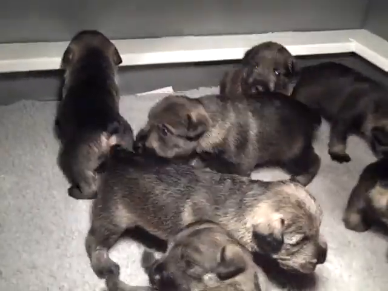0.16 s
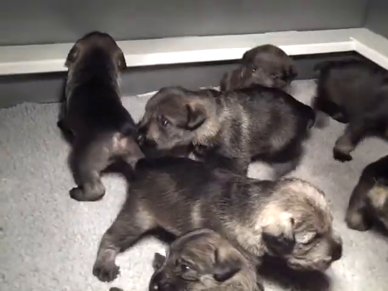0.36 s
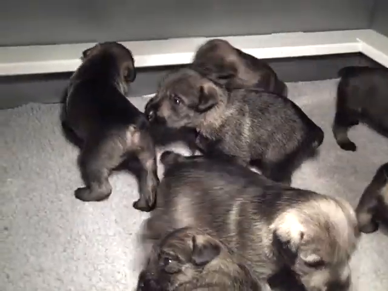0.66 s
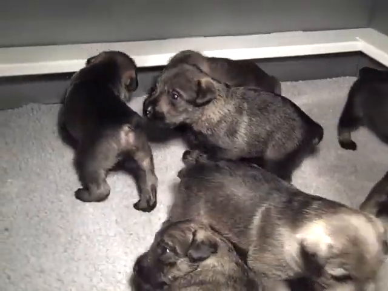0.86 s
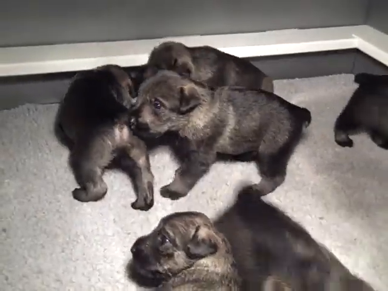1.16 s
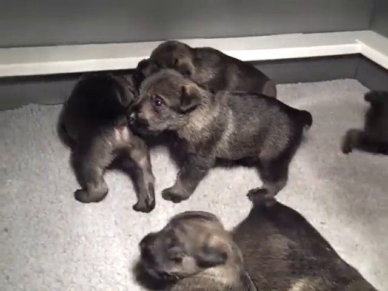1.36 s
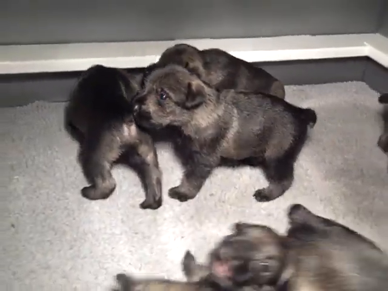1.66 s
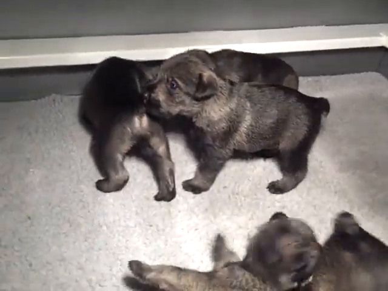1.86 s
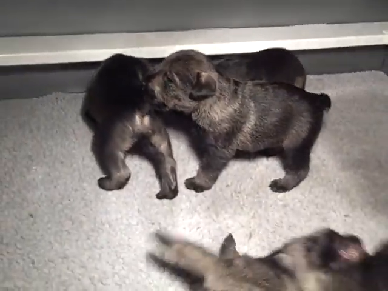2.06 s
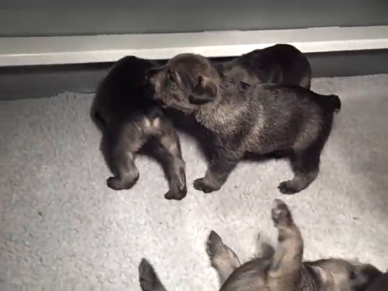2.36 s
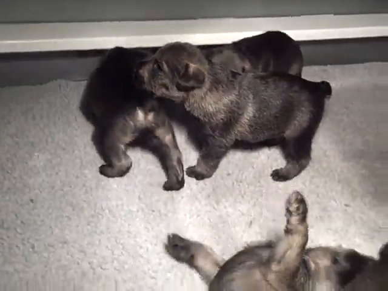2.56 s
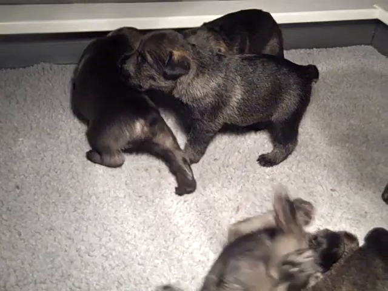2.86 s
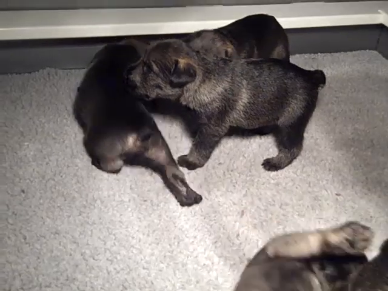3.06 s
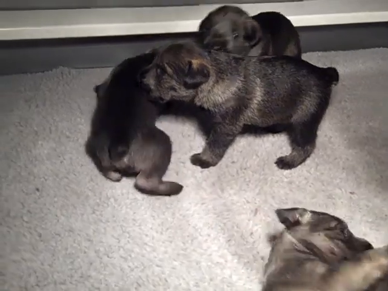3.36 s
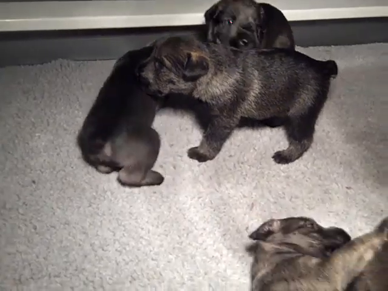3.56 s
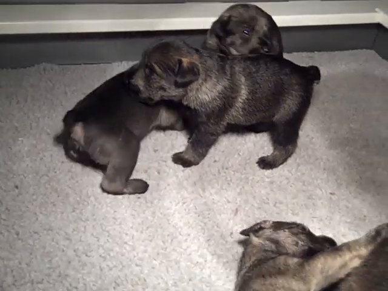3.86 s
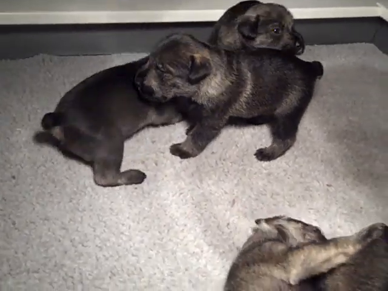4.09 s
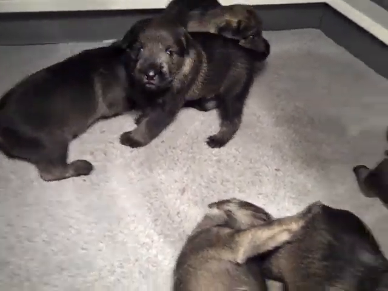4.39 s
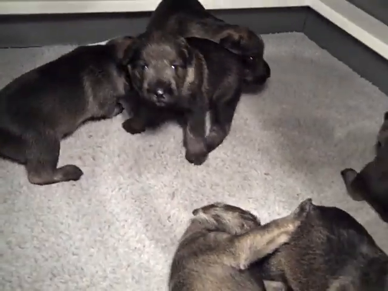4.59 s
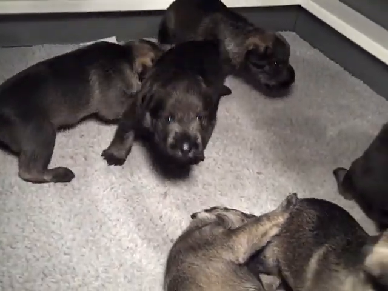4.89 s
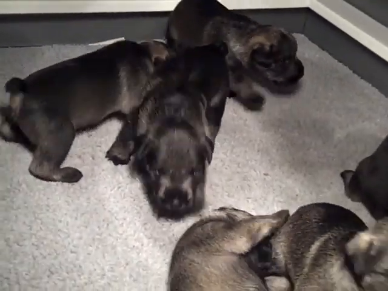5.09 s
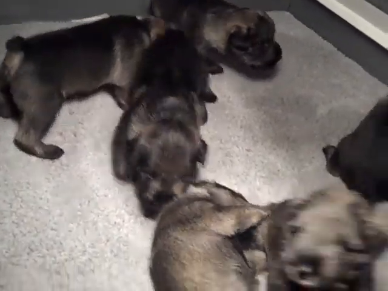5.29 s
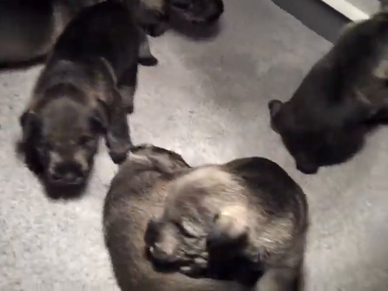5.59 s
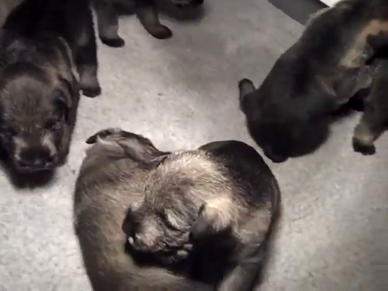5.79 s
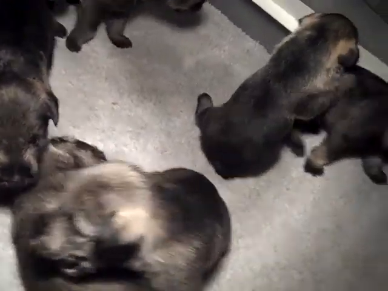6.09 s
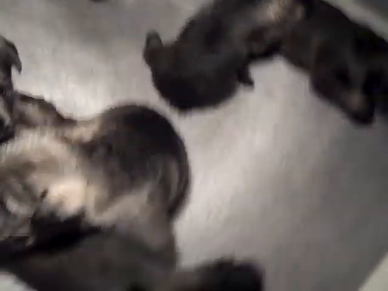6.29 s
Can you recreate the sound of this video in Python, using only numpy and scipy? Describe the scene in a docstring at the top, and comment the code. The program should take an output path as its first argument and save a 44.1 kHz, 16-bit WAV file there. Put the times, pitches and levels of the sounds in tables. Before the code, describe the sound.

Close stereo microphone among small puppies wrestling indoors. Fur and paws rustle on carpet throughout, with muffled low scuffling. After two weak whimpers come a few soft, low thumps, then a thin hoarse yip, a bright squeal and a string of clear whining yelps. Short closed-mouth grunts, claw ticks and lighter knocks follow, and the rubbing swells at the end in a short, faint room echo.

```python
"""Young puppies in a low-walled pen on carpet, close to a microphone with two ports.
Rubbing noise runs throughout: first come two faint whines, then thumps of paws and bodies, which ring
the floor, and sharp ticks, short noise bursts. From 2 s, yips and squeals rise in stacks of overtones
with breath and hiss; low nasal grunts join at 3.5 s, and after the last squeal, at 5 s, grunts, thumps,
ticks and stronger rubbing go on to the end. Echoing delays make the short ring of the pen."""
import sys
import numpy as np
from scipy import signal
from scipy.fft import rfft, irfft
from scipy.io import wavfile
from scipy.ndimage import uniform_filter1d

SR = 44100
rng = np.random.default_rng(int(sys.argv[2]) if len(sys.argv) > 2 else 0)


def wrap_up_sound(samples):
    """Save the sound to the file named by the first command line argument, as 16-bit audio."""
    columns = np.atleast_2d(samples).T
    # keep every value between -1 and 1, then stretch to whole-number steps
    tamed = np.clip(columns, -1, 1)
    steps = np.round(tamed * 32767).astype(np.int16)
    wavfile.write(sys.argv[1], SR, steps)


N = 284004

# Fur and paws rubbing the carpet. Each row: time in seconds, level of the high rustle in dB.
RUBBING = [(0, -53.5), (1.95, -57.5), (2.5, -55.5), (3.802, -52), (4.251, -55), (4.648, -52),
           (5.199, -55.5), (5.399, -50), (5.7, -57), (5.85, -51.5), (6.151, -52.5), (6.248, -46.5),
           (6.44, -47.5)]
# Tone of the low scuffle. Each row: frequency in Hz, relative level in dB per Hz.
SCUFFLE_TONE = [(12, -33), (20, 2.5), (70, -1), (142, -3.5), (406, -7), (775, -11.5), (2500, -23.5),
                (3250, -56.5)]
# Tone of the high rustle. Each row: frequency in Hz, relative level in dB per Hz.
RUSTLE_TONE = [(880, -37), (1500, -4), (3220, -3.5), (5070, -5.5), (6540, 1), (7890, 1.5), (9350, -9),
               (14300, -16.5)]
# How alike the rubbing is left and right. Each row: frequency in Hz, likeness (1 is the same).
RUB_LIKENESS = [(60, 0.57), (240, 0.68), (930, 0.33), (3680, 0.016), (14500, 0.02)]
# Balance of the rubbing. Each row: frequency in Hz, left minus right in dB.
RUB_LEAN = [(40, 2), (370, 2.5), (2330, -0.5), (14500, 3)]
# Balance of the near sources. Each row: frequency in Hz, left minus right in dB.
NEAR_LEAN = [(200, 1), (800, -1.5), (2000, 2), (4500, 0.5), (6500, -6.5), (8500, 12), (13000, 13.5)]
# Timing of the near sources. Each row: frequency in Hz, lead of the left port in radians.
NEAR_TURN = [(700, 0.1), (1000, .3), (1550, 0.99), (2500, -0.14), (3700, -0.1), (5200, 0.5), (5850, 0.39),
             (8300, 0.061), (10000, -4.6)]
# Paws and bodies on the floor. Each row: start in seconds, strength in dB,
# brightness (extra dB for modes above 300 Hz).
BLOWS = [(0.846, -37, -32), (0.924, -29.5, -9.5), (0.958, -48, 2), (1.272, -36, -18), (1.243, -31.5, -10),
         (1.362, -18, -5.5), (1.399, -27.5, -16), (1.593, -33, -7), (1.431, -33.5, -23), (2.057, -35, -8),
         (2.617, -36.5, -6.5), (4.772, -36, 3), (5.142, -34, -3), (5.262, -45, 10), (5.279, -38, 5.5),
         (5.418, -39, 12), (5.796, -34, -1.5), (6.136, -43, 5)]
# Ringing of the floor. Each row: frequency in Hz, relative level in dB, time to fall 60 dB in seconds.
FLOOR_RINGS = [(56.6, -13.5, 0.29), (75.8, -8, 0.22), (129, -1.5, 0.055), (251, -8.5, 0.053)]
# Short knocks of harder contact. Each row: frequency in Hz, relative level in dB,
# time to fall 60 dB in seconds.
KNOCK_RINGS = [(392, 4.5, 0.033), (518, -5, 0.082), (733, -2.5, 0.022), (1546, -7, 0.0079),
               (1956, -12, 0.012), (2900, -16, 0.016)]
# Claw and lip ticks. Each row: start in seconds, peak in dB before the ports colour it, centre in Hz.
TICK_HITS = [(0.35, -45.5, 1490), (0.712, -39, 6600), (0.8367, -38.5, 3500), (1.094, -37, 6240),
             (1.44, -42, 5660), (2.165, -29.5, 2160), (3.191, -32, 6160), (3.189, -40, 3570),
             (3.553, -33.5, 3900), (3.672, -27.5, 1610), (3.67, -30.5, 5020), (3.677, -36.5, 5200),
             (3.687, -31.5, 1490), (3.8133, -38, 6960), (4.3377, -27, 2730), (4.588, -41, 4200),
             (4.773, -39, 5500), (5.4095, -39.5, 2830), (5.787, -42.5, 7580), (6.2356, -29, 6200),
             (6.377, -29, 2360)]
# Low closed-mouth grunts. Each row: start in seconds, length in seconds, pitch in Hz, glide over the
# grunt in Hz, arch at its middle in Hz, fundamental in dB, half-pitch lines in dB relative to it.
GRUNT_CALLS = [(3.471, 0.13, 247, 5.5, 4, -44.5, -33), (3.79, 0.098, 263.3, -42, 3.5, -40.5, -10),
               (4.537, 0.18, 279.2, -21.5, 2.5, -50.5, 9), (5.307, 0.23, 317.9, 10, 35.6, -37, -10.5),
               (5.806, 0.058, 266.4, 60, 4.1, -41, -7), (6.422, 0.057, 228.5, 28, 3, -38, -17)]
# Nose colour of the grunts. Each row: frequency in Hz, relative level in dB.
NOSE_TONE = [(130, -30.5), (250, 20), (450, 1.5), (720, 7.5), (1050, -3), (1500, -63)]
# Air through the nose. Each row: frequency in Hz, relative level in dB per Hz.
WHEEZE_TONE = [(4500, -46), (6000, -12), (8500, 5.5), (10200, -5.5), (11500, -26), (13000, -5), (14300, 1)]
# High calls, one list each. Each row: time in seconds, pitch in Hz, fundamental in dB,
# octave in dB, upper overtones together in dB.
CALLS = [
    [(0.212, 752, -53, -68, -64), (0.226, 658, -30, -73, -62), (0.242, 663, -54, -70, -58),
     (0.268, 670, -49, -70, -70)],
    [(0.47, 813, -71, -88, -77), (0.594, 840, -46, -68, -63), (0.65, 879, -38.5, -48.5, -58),
     (0.694, 786, -40.5, -67, -70), (0.738, 825, -49, -70, -85)],
    [(2.066, 1016, -82, -59, -34), (2.074, 1037, -32.5, -40.5, -46.5), (2.11, 1157, -43.5, -33, -31.5),
     (2.146, 1224, -33, -56, -32), (2.246, 1314, -32.5, -59, -29), (2.34, 1127, -38, -38, -27),
     (2.384, 1129, -28.5, -47, -30), (2.4, 1086, -25, -36, -35), (2.418, 1145, -57.5, -26.5, -40.5)],
    [(2.632, 865, -25.5, -36.5, -40), (2.654, 878, -20, -23.5, -18.5), (2.669, 976, -30, -32, -12.5),
     (2.676, 1006, -21.5, -19, -19), (2.682, 1157, -34.5, -15.5, -25), (2.692, 1215, -37, -19, -21),
     (2.704, 1240, -32, -25, -20), (2.722, 1219, -34.5, -21, -22.5), (2.737, 1085, -24.5, -23, -19.5),
     (2.746, 972, -26.5, -23.5, -19.5), (2.762, 884, -25.5, -34, -18), (2.782, 863.4, -17, -28, -20),
     (2.814, 878, -24.5, -27.5, -28), (2.862, 797, -20.5, -45.5, -38.5), (2.91, 804, -22, -44, -39),
     (2.944, 839, -25, -35, -39.5), (2.98, 810, -23.5, -42, -38), (3.022, 838, -21.5, -35.5, -31.5),
     (3.056, 829.7, -20, -37, -30), (3.076, 913, -19, -31, -30)],
    [(3.262, 896, -69, -96, -98), (3.287, 1043, -29, -46, -62), (3.293, 774, -21.5, -39, -38),
     (3.347, 884, -21.5, -29.5, -25), (3.371, 840, -23, -39, -33), (3.385, 782, -19, -28.5, -37.5),
     (3.431, 798, -25, -36, -42)],
    [(3.4, 1393, -40, -48, -31), (3.424, 1320, -34.5, -51, -36), (3.478, 1398, -39, -45.5, -41.5),
     (3.558, 1328, -35, -41, -39), (3.61, 1306, -38.5, -50, -47.5), (3.654, 1100, -28.5, -43, -54)],
    [(3.605, 793, -37, -74, -60), (3.639, 899, -30.5, -35, -58), (3.657, 880, -43.5, -54.5, -61),
     (3.669, 854, -27.5, -42.5, -54), (3.677, 770, -33, -41.5, -44), (3.685, 660, -31.5, -39.5, -53),
     (3.705, 730, -49.5, -59.5, -54)],
    [(3.875, 755, -57, -87, -61), (3.942, 945, -32, -75, -58), (3.957, 993, -20, -60.5, -44.5),
     (3.968, 923.6, -17, -44, -48.5), (4.03, 965.5, -18, -40.5, -50), (4.062, 905, -15.5, -43.5, -52),
     (4.111, 937, -17.5, -44.5, -48), (4.135, 899, -19.5, -46, -54.5), (4.155, 755, -28.5, -46, -48)],
    [(4.383, 567, -49.5, -90, -69), (4.412, 759, -41.5, -92, -60), (4.431, 804, -16, -50, -50),
     (4.438, 736, -14.5, -41.5, -48.5), (4.475, 769, -13, -40, -48.5), (4.491, 822, -13.5, -43.5, -53),
     (4.505, 898, -18, -51.5, -43.5), (4.547, 865, -18.5, -39, -58)],
    [(4.777, 722, -54.5, -86, -67), (4.801, 900, -37.5, -69, -60), (4.814, 996, -18.5, -39, -42),
     (4.821, 840, -16, -40, -39), (4.875, 967, -16, -38.5, -38), (4.949, 897, -16.5, -44, -43.5),
     (5.003, 769, -14.5, -49, -46), (5.04, 744, -20.5, -53, -46.5)],
]
# How each call is voiced and placed. Each row: mouth opening from 0 to 1, breath in dB and half-pitch
# lines in dB against the overtones, left minus right in dB, delay of the left port in microseconds,
# lift of the highest overtones in dB, hoarseness at start and end in dB.
CALL_VOICES = [(0.34, -30, -30, 0.25, 25, 0.1, .1), (0.092, -25, -30, 1, 3, 0.1, .1),
               (0.61, -8.5, -24, -1.5, -33, 5.2, 1.9), (0.93, -22.5, -22, 0.35, -13.5, 4.2, 6.6),
               (0.65, -10.5, -14, -0.67, 33, 0.093, 3.8), (0.033, -23, -35, -1.8, 47, 0.1, 4.8),
               (0.3, -15.5, -12, 0, 53, 0.09, 3.3), (0.029, -9, -20.5, 0.075, 44.5, 3, 2.9),
               (.03, -14, -26, 0.053, 50, 2.4, 1.67), (0.02, -28, -39, -1.1, 55, 0.1, 2.3)]
# Resonances of the wide mouth. Each row: centre in Hz, width in Hz, level in dB.
WIDE_MOUTH = [(2780, 690, 9), (4370, 2100, 7.5), (6640, 2000, -15), (8320, 760, -17.5)]
# Resonances of the nearly shut mouth. Each row: centre in Hz, width in Hz, level in dB.
SHUT_MOUTH = [(2330, 1800, 1.5), (5850, 2300, 3.5), (6940, 700, -3.5), (8060, 2130, -2.5)]
# Breath beside the overtones. Each row: frequency in Hz, relative level in dB.
BREATH_TONE = [(1500, 5), (2500, -15), (4200, -18), (7500, 7.5), (10000, 14)]

CUTOFF_HZ = 15200
SCUFFLE_DB, SCUFFLE_FOLLOWS = -53.5, 0.85    # low scuffle at mean rubbing; share of the rustle's swing
ROOM_T60_S, WALL_CUT_HZ, ROOM_DB = 0.33, 33000, -26    # fall by 60 dB, dulling per echo, echo gain
GRUNT_ATTACK_S, GRUNT_RELEASE_S = 0.0034, 0.038
WHINE_ATTACK_S, WHINE_RELEASE_S, WHINE_SHIMMER_DB = 0.0031, 0.01, 1.46
LINGER_S = 0.027    # air keeps flowing after the folds stop
HOARSE_S = 0.025    # how long the folds stay hoarse as they catch and let go
BREAK_DB_PER_OCT_S = 0.35    # fast glides roughen the voice: extra dB per octave a second
BEADING_DB, BEADING_PER_S = 3.0, 140.0    # fast trembling of the overtones: depth and rate
RASP_DB, RASP_HZ = -4, 450    # noisy skirt round the octave: dB against the breath, width
RASP_SWING_DB, CRACK = 2.5, 0.09    # coming and going of breath; shake of a hoarse fundamental
TOP_HZ = 6400    # above it the overtones take each call's own lift


def from_db(db):
    """Turn dB into a plain gain."""
    return 10 ** (np.asarray(db) / 20)


def rms_one(x):
    """Scale a sound to an average (rms) level of 1."""
    return x / np.sqrt(np.mean(x ** 2) + 1e-20)


def at_hz(points, hz):
    """Read a frequency table between its rows, on a log scale."""
    table = np.array(points)
    return np.interp(np.log(hz), np.log(table[:, 0]), table[:, 1])


def span(rows, attack_s, release_s):
    """Samples of a call, its swell and cut-off, and its columns sample by sample."""
    s, *columns = np.transpose(rows)
    at = np.arange(int(s[0] * SR), min(N, int(s[-1] * SR)))
    t = at / SR
    fade = np.clip(np.minimum((t - s[0]) / attack_s, (s[-1] - t) / release_s), 0, 1) ** 2
    return at, fade, [np.interp(t, s, c) for c in columns]


def drift(rate):
    """Wandering chance: noise through a double one-pole low-pass, run in; spread 1."""
    r = np.exp(-2 * np.pi * rate / SR)
    noise = rng.standard_normal(N + SR)
    return rms_one(signal.lfilter([1], [1, -2 * r, r * r], noise)[SR:])


def banded_noise(spectrum, patchy_db):
    """Third-octave bands of stereo noise, each with its own level, flicker, likeness and lean; rms 1."""
    out, together = 0, drift(8.0)
    edges = 20 * 2 ** np.arange(0, 9.6, 1 / 3)
    white = rng.standard_normal((2, 2, N))
    for k, (low, high) in enumerate(zip(edges, edges[1:])):
        hz = np.sqrt(low * high)
        if not spectrum[0][0] <= hz <= spectrum[-1][0]:
            continue
        band = signal.butter(2, [low, high], "band", fs=SR, output="sos")
        mid, side = signal.sosfilt(band, white[k % 2])
        alike = np.clip(at_hz(RUB_LIKENESS, hz), -1, 1)
        flicker = 0.32 * together + 1.1 * drift(40.0)
        gain = from_db(at_hz(spectrum, hz) + patchy_db * flicker)
        pair = np.sqrt(1 + alike) * mid + np.sqrt(1 - alike) * side * [[1], [-1]]
        lean = from_db(at_hz(RUB_LEAN, hz) / 2 * np.array([[1], [-1]]))
        out = out + gain * pair * lean
    return rms_one(out)


def rubbing():
    """Fur and paws on carpet: a low scuffle and a high rustle of noise swell together."""
    rub_db = np.interp(np.arange(N) / SR, *np.transpose(RUBBING))
    scuffle_db = SCUFFLE_DB + SCUFFLE_FOLLOWS * (rub_db - rub_db.mean())
    scuffle = from_db(scuffle_db) * banded_noise(SCUFFLE_TONE, patchy_db=2.5)
    rustle = from_db(rub_db) * banded_noise(RUSTLE_TONE, patchy_db=2.5)
    return scuffle + rustle


def room(x):
    """Pen echo: six feedback delays a side, duller on every round, stepped block by block."""
    out, dull = np.zeros((2, N)), np.exp(-2 * np.pi * WALL_CUT_HZ / SR)
    lags = (rng.uniform(0.008, 0.026, 12) * SR).astype(int)
    for k, lag in enumerate(lags):
        loop, gain, state = x.copy(), from_db(-60 * lag / SR / ROOM_T60_S), [0.]
        for i in range(lag, N, lag):
            back, state = signal.lfilter([gain * (1 - dull)], [1, -dull], loop[i - lag:i], zi=state)
            loop[i:i + lag] += back[:N - i]
        out[k % 2] += (loop - x) * (-1) ** (k // 2)    # echoes only
    return out


def ports(x):
    """The two microphone ports colour and delay a near source differently."""
    hz = np.fft.rfftfreq(N, 1 / SR) + 1
    half = from_db(at_hz(NEAR_LEAN, hz) / 2) * np.exp(.5j * at_hz(NEAR_TURN, hz))
    return irfft(rfft(x) * [half, 1 / half], N)


def ring(clicks, hz, t60):
    """A unit click sets a dying sine ringing from height 1."""
    r, w = from_db(-60 / (t60 * SR)), 2 * np.pi * hz / SR
    return signal.lfilter([0, np.sin(w)], [1, -2 * r * np.cos(w), r * r], clicks + 1e-18)


def thumps():
    """A soft blow rings the floor; harder contact adds short knock modes."""
    s, strength_db, bright_db = np.transpose(BLOWS)
    at, out = np.round(s * SR).astype(int), np.zeros(N)
    chance_db = rng.normal(0, 3, (len(at), 10))
    for k, (hz, level_db, t60) in enumerate(FLOOR_RINGS + KNOCK_RINGS):
        extra_db = bright_db if hz > 300 else 0
        clicks = np.zeros(N)
        clicks[at] = from_db(strength_db + level_db - 5.0 + extra_db + chance_db[:, k]) * (-1) ** k
        out += ring(clicks, hz, t60)
    # a body lands unevenly: a few weaker contacts follow within milliseconds
    contacts = (rng.random(1200) < 0.006) * 0.4 * rng.standard_normal(1200)
    landing = contacts * np.exp(-np.arange(1200) / 500.)
    landing[0] = 1
    soften = signal.butter(1, 2200, fs=SR, output="sos")
    return signal.sosfilt(soften, np.convolve(out, landing)[:N])


def ticks(decay_s=0.003, width=1.3):
    """Each claw or lip tick is a few milliseconds of noise around its own centre."""
    out, t = np.zeros(N), np.arange(1024) / SR
    noises = rng.standard_normal((len(TICK_HITS), 1024))
    for (s, peak_db, hz), noise in zip(TICK_HITS, noises):
        band = signal.butter(3, [hz / width, min(hz * width, .4 * SR)], "band", fs=SR, output="sos")
        shape = np.minimum(t / 0.001, 1) * np.exp(-t / decay_s)
        burst = signal.sosfilt(band, noise * shape)
        i = round(s * SR)
        out[i:i + 1024] += from_db(peak_db) * burst / np.abs(burst).max()
    return out


def grunts(jitter=0.006, waver=0.012, shimmer_db=2.5, patchy_db=5.0, creak_db=-22):
    """Low hums through the nose; strong-weak fold cycles add half-pitch lines, which come and go."""
    out, wobble = np.zeros(N), jitter * drift(60.0) + waver * drift(14.0)
    flutter, patches = drift(110.0), drift(33.0)
    creak_band = signal.butter(4, [400, 1000], "band", fs=SR, output="sos")
    creak = rms_one(signal.sosfilt(creak_band, rng.standard_normal(N)))
    for s, length, hz, glide_hz, arch_hz, level_db, half_db in GRUNT_CALLS:
        ends = [(s, hz), (s + length, hz + glide_hz)]
        at, fade, (pitch,) = span(ends, GRUNT_ATTACK_S, GRUNT_RELEASE_S)
        pitch = pitch + arch_hz * np.sqrt(np.sin(np.linspace(0, np.pi, len(at))).clip(0))
        phase = np.pi * np.cumsum(pitch * (1 + wobble[at])) / SR    # half the pitch
        for k in range(1, 16):
            line_db = at_hz(NOSE_TONE, k * pitch / 2) - at_hz(NOSE_TONE, pitch) + half_db * (k % 2)
            if k % 2:    # weak half lines come in bursts, all together
                line_db = line_db + patchy_db * patches[at] * (half_db < 0)
            elif k > 2:
                line_db = line_db + patchy_db / 3 * patches[(at + 9000 * k) % N]
            line_fade = fade ** np.where(at < at.mean(), 0.5, k / 4)    # higher lines die first
            height = np.sqrt(2) * from_db(level_db + line_db + shimmer_db * flutter[at])
            out[at] += line_fade * height * np.sin(k * phase + k * k)
        # the folds creak as they catch and whenever the cycles turn uneven
        catch_db = 10 * np.exp((at[0] - at) / (HOARSE_S * SR))
        creak_gain = from_db(level_db + creak_db + catch_db + patchy_db * patches[at])
        out[at] += np.sqrt(fade) * creak_gain * creak[at] * (1 + np.sin(phase))
    return out


def wheeze(level_db=-38, follow=0.16, follow_upper=0.12):
    """Thin air hiss, own noise in each port, rises a little with each call from the third and lingers."""
    gate = np.zeros(N)
    for rows, (*_, hoarse_db) in zip(CALLS[2:], CALL_VOICES[2:]):
        at, fade, (_, first_db, _, upper_db) = span(rows, WHINE_ATTACK_S, WHINE_RELEASE_S)
        gasp_db = hoarse_db * np.exp((at - at[-1]) / (HOARSE_S * SR))    # a hoarse call ends in a gasp
        hiss_db = level_db + gasp_db + follow * first_db + follow_upper * upper_db
        gate[at] = np.maximum(gate[at], np.sqrt(fade) * from_db(hiss_db))
    # the gate may jump up, but falls only slowly
    fall = np.arange(N) / (LINGER_S * SR)
    gate = np.exp(np.maximum.accumulate(np.log(gate + 1e-9) + fall) - fall)
    hz, swell, out = np.fft.rfftfreq(N, 1 / SR) + 1, drift(13.0), 0
    air = rfft(rng.standard_normal((2, N))) * from_db(at_hz(WHEEZE_TONE, hz))
    for low, high in [(0, 7000), (7000, 9000), (9000, 11500), (11500, SR)]:
        band = irfft(air * (hz > low) * (hz <= high), N)
        out = out + from_db(1.5 * swell + 2.5 * drift(18.0)) * band    # partly shared, partly own swell
    return gate * rms_one(out)


def throat(hz, opening):
    """Gain of the mouth: steep resonance peaks, blended from nearly shut to wide."""
    def peaks(shape):
        return sum(from_db(db) / (1 + (2 * (hz - centre) / width) ** 2) ** 2
                   for centre, width, db in shape)
    share = np.clip(opening, 0, 1)
    return share * peaks(WIDE_MOUTH) + (1 - share) * peaks(SHUT_MOUTH)


def hoarseness(at, pitch, first_db, hoarse_db):
    """Roughness in dB as the folds catch and let go, and in fast glides."""
    loud = at[first_db > first_db.max() - 12]
    from_edge = np.minimum(abs(at - loud[0]), abs(at - loud[-1]))
    edges_db = hoarse_db * np.exp(-from_edge / (HOARSE_S * SR))
    octaves_per_s = abs(np.gradient(np.log2(pitch))) * SR
    return edges_db + np.minimum(BREAK_DB_PER_OCT_S * octaves_per_s, 9)


def whines(jitter=0.0043, waver=0.0029, patchy_db=2.5, grain_rad=0.032, turn_rad=0.43, line_top_hz=10000):
    """Vocal folds give a near-sine and its octave; higher overtones and breath pass the mouth."""
    out, wobble, rasp = np.zeros((2, N)), jitter * drift(140.0) + waver * drift(25.0), drift(2.2)
    patches, grain, beads = drift(15.0), grain_rad * drift(130.0), BEADING_DB * drift(BEADING_PER_S)
    skirt, turns = drift(RASP_HZ), drift(9.0)
    for rows, voice in zip(CALLS, CALL_VOICES):
        opening, breath_db, half_db, pan_db, late_us, top_db, hoarse_db = voice
        at, fade, columns = span(rows, WHINE_ATTACK_S, WHINE_RELEASE_S)
        pitch, first_db, octave_db, upper_db = columns
        pitch = uniform_filter1d(pitch, size=180, mode="nearest")    # the folds glide, never turn sharply
        phase = np.pi * np.cumsum(pitch * (1 + wobble[at])) / SR    # half the pitch
        hoarse = hoarseness(at, pitch, first_db, hoarse_db)

        def own(chance, k):    # a different stretch of chance for each overtone
            return chance[(at + 9000 * k) % N]

        def turn(k):    # overtones reach the two ports unevenly as the head turns
            return turn_rad * own(turns, k) * [[1], [-1]]

        # strong-weak fold cycles put faint lines (odd k) half-way between the overtones
        upper, power = 0, 0
        for k in [3, *range(5, 30)]:
            line_hz = k * pitch / 2
            lift_db = top_db / (1 + (TOP_HZ / line_hz) ** 8)
            gain = throat(line_hz, opening) * from_db((half_db + hoarse) * (k % 2) + lift_db)
            gain = gain * (line_hz < line_top_hz)    # at the very top only air is heard
            tremble = from_db(patchy_db * own(patches, k) + own(beads, k))
            upper = upper + gain * tremble * np.sin(k * phase + k * k + own(grain, k) + turn(k))
            power = power + gain ** 2
        upper /= np.sqrt(power / 2)

        hz = np.fft.rfftfreq(len(at), 1 / SR)
        air = rfft(rng.standard_normal(len(at))) * throat(hz, opening) * from_db(at_hz(BREATH_TONE, hz + 1))
        rasp_db = RASP_SWING_DB * rasp[at]
        # effort strengthens the overtones more than the air
        effort_db = 0.25 * (upper_db.mean() - upper_db)
        puffs = rms_one(irfft(air, len(at))) * (1 + 0.5 * np.sin(2 * phase))
        puffs *= from_db(breath_db + rasp_db + effort_db + hoarse)

        crack = 1 + CRACK * (from_db(hoarse) - 1) * beads[at] / BEADING_DB
        first = from_db(first_db + WHINE_SHIMMER_DB * patches[at]) * crack * np.sin(2 * phase)
        octave = from_db(octave_db + beads[at]) * np.sin(4 * phase + turn(4))
        # uneven fold cycles smear a noisy skirt round the octave
        smear = from_db(upper_db + breath_db + RASP_DB + rasp_db) * skirt[at] * np.sin(4 * phase)
        folds = np.sqrt(2) * (first + octave) + smear
        call = rfft(fade * (folds + from_db(upper_db) * (upper + puffs)))
        half = from_db(pan_db / 2) * np.exp(-1j * np.pi * hz * late_us / 10 ** 6)
        out[:, at] += irfft(call * [half, 1 / half], len(at))
    return out


def scene():
    """Voices and blows in the room, over the rubbing on the carpet."""
    near = thumps() + ticks() + grunts() + wheeze() + whines()
    echo = from_db(ROOM_DB) * room(near.mean(axis=0))
    return rubbing() + echo + ports(near)


def record(dry):
    """A steep low-pass cuts the top."""
    return signal.sosfilt(signal.cheby2(12, 70, CUTOFF_HZ, fs=SR, output="sos"), dry)


dry = scene()
out = record(dry)
wrap_up_sound(out)
```